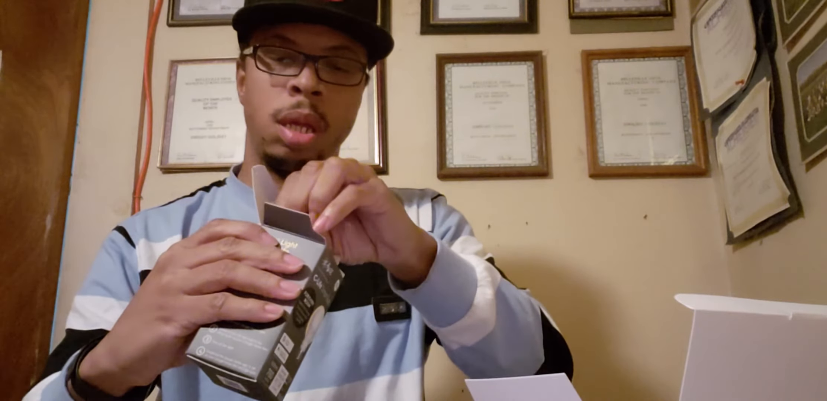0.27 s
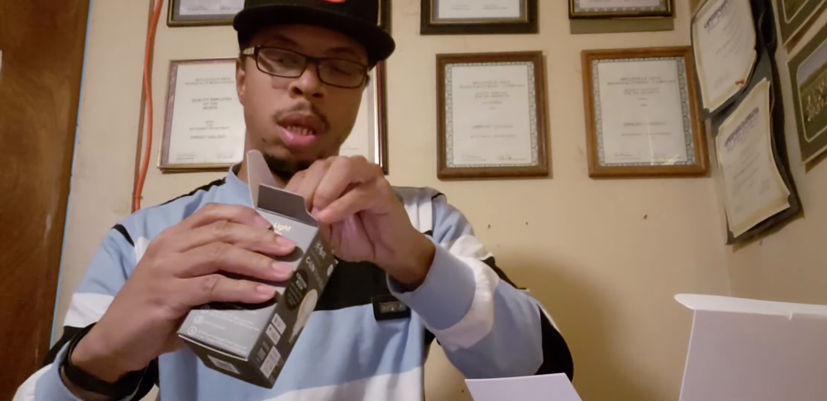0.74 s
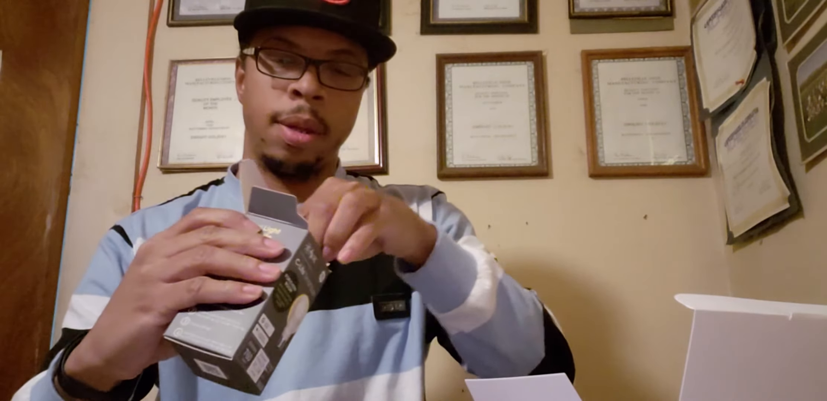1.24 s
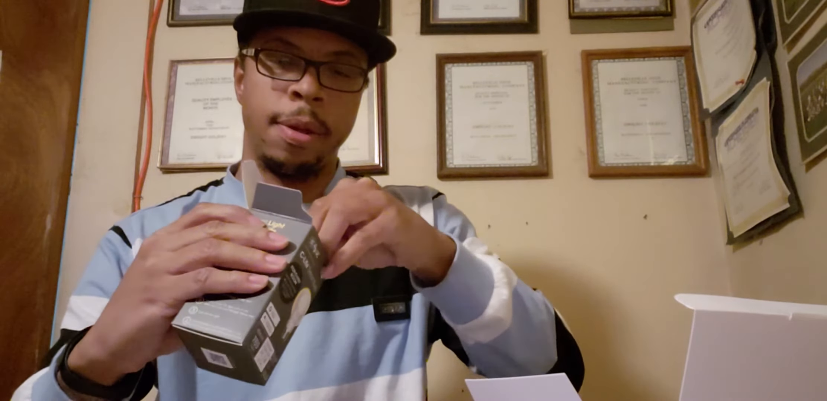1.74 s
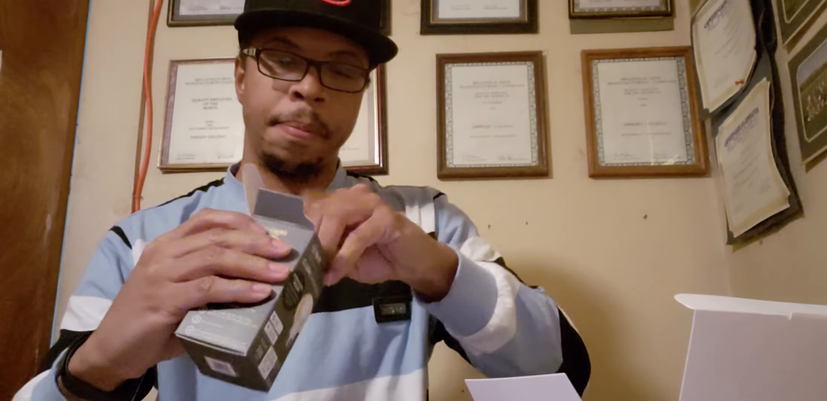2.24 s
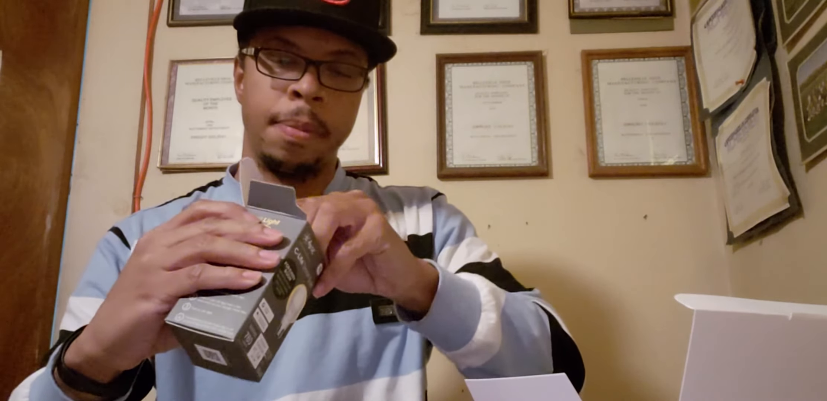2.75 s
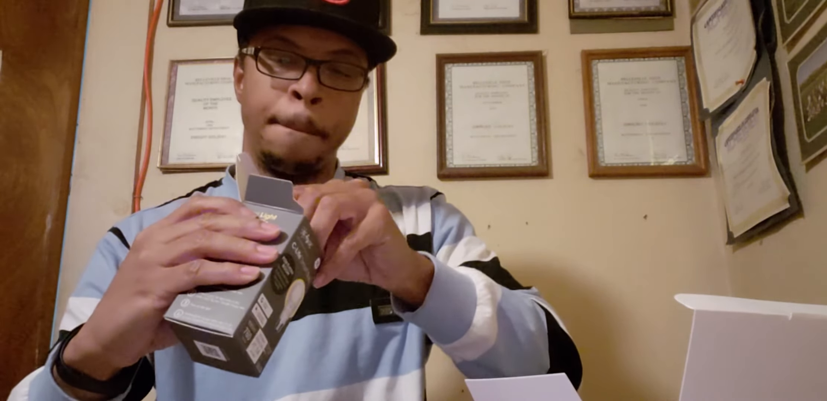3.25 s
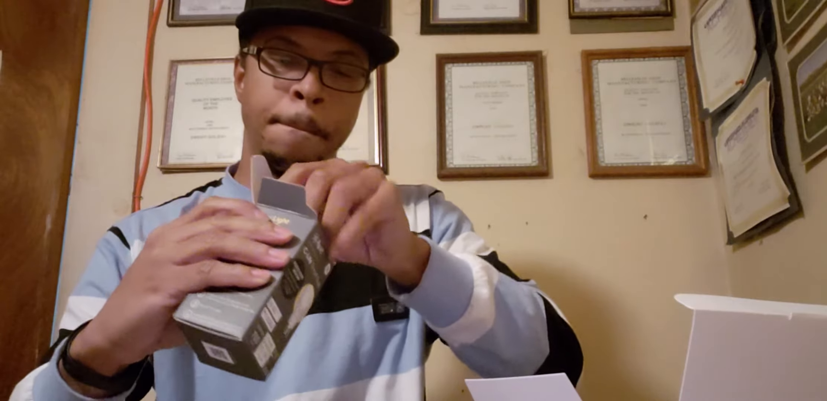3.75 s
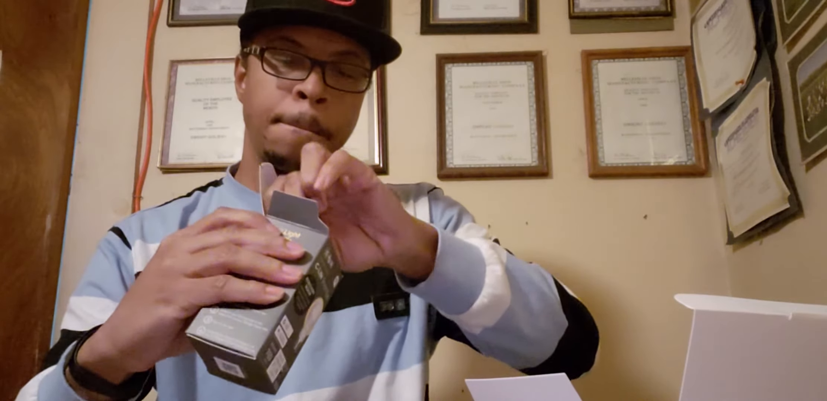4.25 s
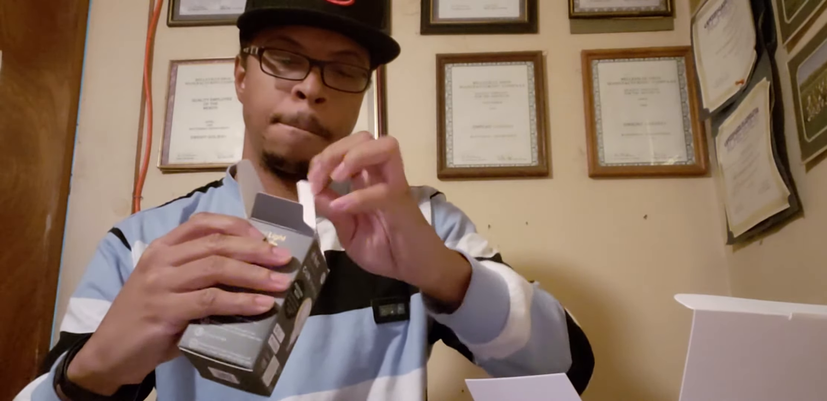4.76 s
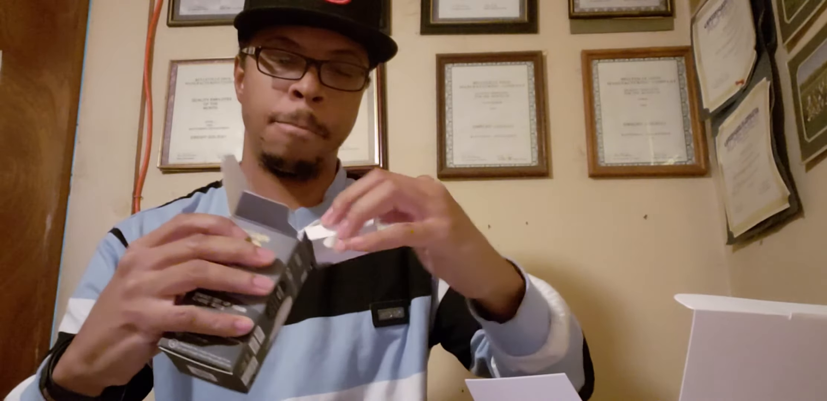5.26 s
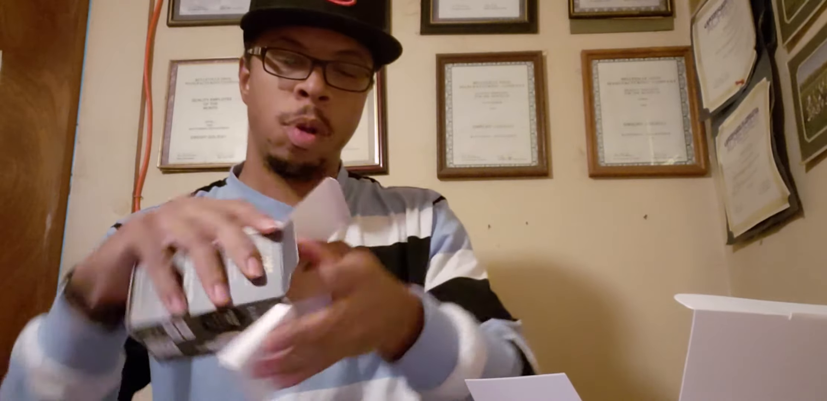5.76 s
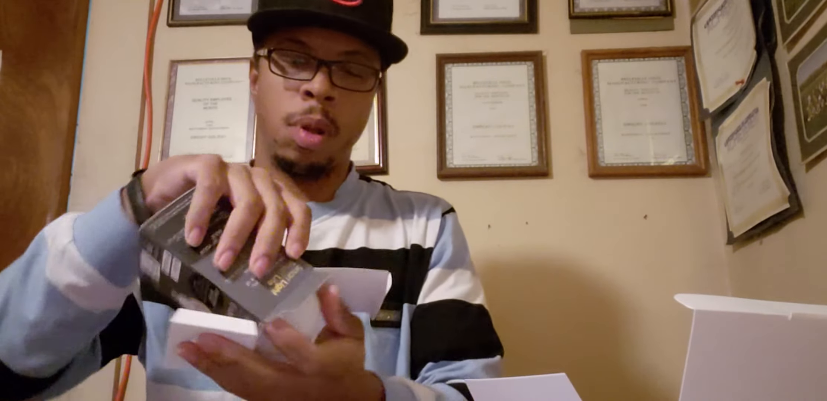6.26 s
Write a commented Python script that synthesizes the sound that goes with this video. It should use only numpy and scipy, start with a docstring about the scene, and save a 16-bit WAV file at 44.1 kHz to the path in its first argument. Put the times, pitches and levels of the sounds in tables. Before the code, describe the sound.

Close dry cardboard fumbling in a quiet small room: scratchy rubbing, faint squeaks, a hard snap midway, later shuffling and a knock into the palm.

```python
"""Fingers pry at the flap and insert of a small cardboard box, close to a two-port microphone in a small quiet room.
Skin and card rub in short strokes of stick-slip grains, with squeaks and narrow papery scrapes in fuzzy lines.
Edges catch and snap free, one loudly; the contents slide out and knock the palm: bursts of slip noise.
These grains and bursts shake the hollow box (low), the card faces (middle) and the paper fibres (treble hiss).
Soft pushes of the box ring low; the room answers the contacts over a faint rumble and hiss."""
import sys
import numpy as np
from scipy import signal
from scipy.fft import rfft, irfft, next_fast_len
from scipy.io import wavfile
from scipy.ndimage import uniform_filter1d

SR = 44100
rng = np.random.default_rng(int(sys.argv[2]) if len(sys.argv) > 2 else 0)


def generate_wav(signal):
    """Clip the signal to [-1, 1] and save it as 16-bit WAV at the path in sys.argv[1]."""
    frames = np.transpose(np.atleast_2d(signal))
    scaled = np.clip(frames, -1, 1) * 32767
    pcm = np.round(scaled).astype(np.int16)
    wavfile.write(sys.argv[1], SR, pcm)


N = 287091  # samples


def gain_of(db):
    """dB to gain."""
    return 10 ** (np.asarray(db) / 20)


def evened(x):
    """Scales to rms 1."""
    return x / np.sqrt(np.mean(x ** 2) + 1e-20)


def read(points, hz):
    """Reads a curve of (f/Hz, value) on a log-frequency axis."""
    f, value = np.transpose(points)
    return np.interp(np.log(hz + 1), np.log(f + 1), value)


def add(mix, s, sound):
    """Adds a sound at time s, cut off where the mix ends."""
    part = mix[..., round(s * SR):][..., :sound.shape[-1]]
    part += sound[..., :part.shape[-1]]


def ring(hz, width, db, rise_s=.0001):
    """A damped mode: a sine that dies faster the wider its resonance (Hz)."""
    t = np.arange(SR // 5) / SR
    envelope = np.exp(-np.pi * width * t) * (1 - np.exp(-t / rise_s))
    return gain_of(db) * np.sqrt(width) * np.sin(2 * np.pi * hz * t) * envelope


def resonate(x, hz, width):
    """A moving resonance: shifts the curve hz down to zero, smooths twice, and shifts back."""
    turn = np.exp(2j * np.pi * np.cumsum(hz) / SR)
    r = np.exp(-np.pi * width / SR)
    smooth = signal.lfilter([1], np.convolve([1, -r], [1, -r]), x / turn)
    return evened((turn * smooth).real)


def tilted(hiss, tilt_db):
    """Trades the upper treble against the lower."""
    low = signal.sosfiltfilt(signal.butter(1, 9500, fs=SR, output="sos"), hiss)
    return gain_of(-tilt_db / 2) * low + gain_of(tilt_db / 2) * (hiss - low)


def bodies():
    """Unit-energy responses of card faces, hollow box and fibres; the small faces radiate little below their modes."""
    # card face modes: f/Hz, width/Hz, relative level/dB
    card_modes = [(1776, 420, 4), (2046, 150, 4), (2740, 450, 5), (3833, 210, 7), (4210, 980, 9),
                  (6340, 7300, -9)]
    # hollow box modes: f/Hz, width/Hz, relative level/dB
    box_modes = [(250, 83, -9.5), (327, 160, -2), (493, 297, 1.5), (762, 89, -0.5), (884, 40, -1),
                 (1050, 370, -5.5), (1269, 84, -2.5)]
    # hiss spectrum of the paper fibres: f/Hz, relative level/dB per Hz
    fibre_curve = [(4000, -24.5), (5800, -4), (7600, 2), (9500, -5), (12000, -0.5), (16000, -6)]
    # neighbouring modes start with opposite sign
    card = sum((-1) ** k * ring(*mode) for k, mode in enumerate(card_modes))
    box = sum((-1) ** k * ring(*mode) for k, mode in enumerate(box_modes))
    card = signal.sosfilt(signal.butter(2, 1500, "high", fs=SR, output="sos"), card)
    fibres = np.zeros(len(card))
    click = irfft(gain_of(read(fibre_curve, np.fft.rfftfreq(128, 1 / SR))))
    fibres[:128] = np.roll(click, 12)
    return [h / np.linalg.norm(h) for h in (card, box, fibres)]


def strokes():
    """Levels of card, box and fibres are the summed power of all strokes; the colour is their power-weighted average."""
    # rubbing strokes: hardest moment/s, swell/s, fade/s, card drive/dB, box drive re card/dB,
    # fibre drive re card/dB, scrape colour/Hz, box tone/Hz, upper re lower treble/dB
    stroke_table = [(0.0, .01, 0.082, -53.5, -2, -2, 4025, 775, -6),
                    (0.236, .05, 0.0415, -55.5, 0.5, -2.5, 2244, 800, 0),
                    (0.383, 0.17, 0.11, -64, -17, -13.5, 2042, 970, -20),
                    (0.518, .08, 0.056, -65.5, -19, -12, 2836, 847, -21),
                    (0.626, 0.073, .1, -65, -23, -10.5, 3230, 1224, -14),
                    (0.684, 0.091, 0.049, -59.5, -8.5, -10, 2936, 1100, -14),
                    (0.869, 0.099, 0.087, -54, -9.5, -5.5, 2760, 942, -13.5),
                    (1.028, .04, 0.21, -56.5, -15.5, -4.5, 2700, 859, 8),
                    (1.21, .08, 0.16, -50.5, -49, -4.5, 3097, 1117, 3),
                    (1.228, .012, 0.12, -63, 3, -10, 2600, 1200, 3),
                    (1.278, .05, 0.034, -60, 1, -19, 2480, 950, -6),
                    (1.371, 0.1, 0.083, -63, -1.5, -3, 2466, 1023, 5),
                    (1.5, 0.033, 0.083, -66, -6, -3, 2427, 814, -12),
                    (1.62, 0.054, 0.12, -60.5, -2, -2, 2544, 834, -1),
                    (1.854, 0.046, 0.041, -55, -45, 1, 3097, 1124, 1),
                    (1.931, 0.013, .04, -68, 0, -7, 2865, 1295, 2),
                    (2.159, 0.066, 0.11, -60.5, -7.5, -8, 3000, 572, -5),
                    (2.292, 0.084, 0.072, -55.5, -19, -3.5, 2920, 897, 4),
                    (2.41, 0.071, 0.14, -58.5, -10, 0.5, 2680, 903, 5),
                    (2.66, 0.008, 0.071, -67.5, -2.5, -8, 2320, 830, -14),
                    (2.72, .03, 0.058, -64, 11.5, -8, 2330, 763, -20),
                    (2.808, .02, .04, -62, 14.5, -9, 2413, 826, -23),
                    (2.865, 0.12, 0.044, -62.5, -22, -5, 3064, 881, -3),
                    (3.018, 0.066, .08, -59, 0, -7, 2093, 688, -12),
                    (3.08, 0.042, 0.046, -73.5, 7.5, -9, 2363, 480, 1.5),
                    (3.186, 0.11, 0.054, -65.5, -36.5, -6, 3730, 856, -15),
                    (3.211, 0.014, .11, -55.5, -4.5, -8.5, 3560, 802, 0),
                    (3.4, 0.36, 0.091, -67, -24, -10, 2943, 776, -1),
                    (3.449, 0.054, 0.17, -61.5, -6, -14, 2840, 726, -20),
                    (3.523, .1, 0.023, -66, -6, -5, 2905, 1012, -3.5),
                    (3.799, 0.14, 0.027, -66, -24, 7, 3640, 823, -0.5),
                    (3.958, 0.19, 0.067, -63.5, -10, -3.5, 2910, 869, -10),
                    (4.03, 0.16, .03, -63.5, -31.5, -11, 2960, 870, -19),
                    (4.095, .02, 0.098, -58, -44, -4.5, 3170, 584, -14),
                    (4.14, 0.12, 0.066, -61.5, -40, -4, 2900, 567, -3),
                    (4.221, 0.12, .1, -74, 0.5, 2.5, 2750, 687, -13),
                    (4.425, 0.02, .05, -66.5, -24.5, -18, 2200, 498, 0),
                    (4.513, 0.022, 0.12, -55, -12.5, -3, 3916, 535, 7),
                    (4.576, .02, .1, -51, -1, -12, 3580, 460, 5),
                    (4.6, .02, .06, -54, -13, -13, 2200, 889, 6),
                    (4.68, 0.15, 0.044, -59, 3, -5, 2590, 623, 18),
                    (4.8, 0.087, 0.156, -71, 7.5, -3, 2028, 875, -1),
                    (4.978, 0.22, 0.14, -68, 0, 0.5, 1840, 790, -0.5),
                    (5.11, .06, 0.2, -57, -9, 4, 2860, 857, -4),
                    (5.2, .015, 0.051, -49.5, -16, 3, 2000, 780, -4),
                    (5.26, 0.12, .035, -59.5, 2, -2, 3450, 772, 7.5),
                    (5.338, 0.036, 0.023, -63.5, -18, -7, 3500, 835, -2.5),
                    (5.394, .015, 0.23, -65.5, -1, -3, 2255, 777, -12),
                    (5.57, .08, 0.044, -47.5, -7.5, -1.5, 3023, 683, 7),
                    (5.652, .05, 0.17, -62, -2, 4.5, 2890, 454, 6),
                    (5.77, 0.04, 0.12, -61.5, 1, 3.5, 2770, 528, 9),
                    (5.832, .1, 0.11, -62, 5, 6.5, 2630, 714, 2),
                    (5.931, .1, 0.043, -58.5, -15, -2, 2686, 471, -1),
                    (6.02, 0.099, .1, -70.5, 11.5, 6, 2367, 644, -8),
                    (6.1, 0.054, 0.12, -49.5, 0, -3, 2300, 747, 5),
                    (6.236, .015, .03, -44.5, -15, -7, 1700, 1094, -4),
                    (6.28, .05, 0.16, -67.5, 11, -3, 1806, 930, -11),
                    (6.33, 0.13, .05, -55, -11, -5, 2016, 926, 6),
                    (6.431, 0.067, 0.035, -48, 0.5, -5, 2600, 392, -8),
                    (6.51, 0.052, .05, -59, 4, -1, 2953, 428, -12)]
    span_db = 20  # level change over one swell or one fade
    s, swell_s, fade_s, card_db, box_db, hiss_db, *colour = np.array(stroke_table).T[:, :, None]
    t = np.arange(N // 32 + 2) * 32 / SR
    drop_db = span_db * np.maximum((s - t) / swell_s, (t - s) / fade_s)
    power = gain_of(2 * (card_db - drop_db)) + 1e-30
    levels = [np.sqrt((power * gain_of(2 * db)).sum(0)) for db in (0, box_db, hiss_db)]
    colour = [(power * c).sum(0) / power.sum(0) for c in colour]
    return [np.interp(np.arange(N) / SR, t, c) for c in levels + colour]


def rubbing():
    """Dense uneven stick-slip grains under a trembling finger; the colour shifts with the grip, also in random patches."""
    # side of the rubbing hand: t/s, left re right level/dB
    hand_side = [(0.0, 2), (3.53, 2), (3.71, 5), (3.95, 1), (4.96, 8), (6.41, 1.5), (6.5, 6)]
    grains_per_s, scrape_width = 6100, 1100  # mean rate, Hz
    scrape_db = -4  # scrape colour re card faces
    card_level, box_level, hiss_level, scrape_hz, box_hz, tilt_db = strokes()
    strength_db = 1.0 * np.minimum(rng.exponential(1, N), 6)
    grains = rng.standard_normal(N) * gain_of(strength_db) * (rng.random(N) < grains_per_s / SR)
    tremble = evened(uniform_filter1d(rng.standard_normal(N), 600))
    drive = evened(grains * gain_of(3.5 * tremble))
    card, box, hiss = (signal.oaconvolve(drive, h)[:N] for h in bodies())
    card = 0.59 * (card + gain_of(scrape_db) * resonate(drive, scrape_hz, scrape_width))
    box = .5 * box + 0.47 * resonate(drive, box_hz, 180)
    sound = card_level * card + box_level * box + hiss_level * tilted(hiss, tilt_db)
    # random patches in time and frequency, 2.2 dB rms
    z = signal.stft(sound, nperseg=256, noverlap=192)[2]
    patches = uniform_filter1d(rng.standard_normal(z.T.shape).T, 6, 0)
    patches = evened(uniform_filter1d(patches, 24, 1))
    sound = signal.istft(z * gain_of(2.2 * patches), nperseg=256, noverlap=192)[1][:N]
    pan_db = np.interp(np.arange(N) / SR, *np.transpose(hand_side))
    return sound * gain_of([pan_db / 2, -pan_db / 2])


def squeaks_and_scrapes():
    """Squeaks and narrow papery scrapes: fuzzy lines on three multiples of one pitch."""
    # squeaks and scrapes: start t/s, length/s, level of the first line/dB, f/Hz,
    # second multiple re first/dB, third multiple re first/dB
    line_table = [(0, 0.033, -62.5, 2060, 2, -2), (0.076, 0.073, -66, 2060, -7, -6.5),
                  (2.644, 0.05, -63, 2170, -25, -29), (0.497, 0.042, -72.5, 2630, -26, -26),
                  (0.65, 0.042, -70.5, 1260, -8, -28), (0.841, 0.034, -64, 2600, -20, -29),
                  (3.977, 0.06, -64, 2990, -26, -24), (4.082, 0.075, -65, 3380, -27.5, -24),
                  (4.41, 0.03, -63.5, 2196, -24.5, -12), (4.824, .21, -72, 2080, -24, -13),
                  (5.05, 0.11, -66.5, 2050, -24, -7)]
    line_width = 150  # Hz for the first line, in proportion for the others
    out = np.zeros(N)
    for (s, length, db, hz, *over_db), chance in zip(line_table, rng.standard_normal((len(line_table), SR // 2))):
        x = chance[:round(length * SR)]
        lines = np.zeros(len(x))
        for k, line_db in enumerate((0, *over_db), start=1):
            lines += gain_of(line_db) * resonate(x, np.full(len(x), k * hz), k * line_width)
        add(out, s, gain_of(db) * lines * signal.windows.tukey(len(x), .4))
    return out


def room(x):
    """A few near echoes, then sparse reflections of random sign, each band dying at its own speed.
    The hands move, so the sound passes slowly from one set of reflections to another."""
    # decay of the room: f/Hz, time to fall 60 dB/s
    decay = [(150, 0.28), (500, 0.13), (1000, 0.24), (2000, 0.18), (5000, 0.19), (12000, 0.15)]
    # share of the reflections common to both ports: f/Hz, share of power
    common = [(300, 0.79), (600, 0.56), (1000, 0.24), (3000, 0.21), (12000, 0.057)]
    # desk and near wall: delay/s, left level/dB, right level/dB
    near_echoes = [(.0022, -19.5, -7.5), (.0065, -10.5, -30), (.011, -9, -18)]
    first_wall, tail_db = 260, -0.5  # samples before the reflections start, tail energy re direct sound
    out, turn = np.zeros((2, N)), np.pi * 1.3 * np.arange(N) / SR
    for shift in range(3):
        # one reflection at a random place in every 20 samples
        taps, places = np.zeros((3, SR // 2)), np.arange(first_wall, SR // 2 - 20, 20)
        places = places + rng.integers(0, 20, (3, len(places)))
        np.put_along_axis(taps, places, rng.choice([-1., 1.], places.shape), 1)
        hz, t, z = signal.stft(taps, SR, nperseg=256)
        same = read(common, hz)[:, None]
        z = np.sqrt(same) * z[0] + np.sqrt(1 - same) * z[1:]
        z = z * gain_of(-60 * t / read(decay, hz)[:, None])
        tail = signal.istft(z, SR, nperseg=256)[1]
        tail = gain_of(tail_db) * tail / np.linalg.norm(tail[0])
        share = np.sqrt(2 / 3) * np.cos(turn + shift * np.pi / 3)
        out += signal.fftconvolve((x * share)[None], tail, axes=1)[:, :N]
    for s, *db in near_echoes:
        add(out, s, gain_of(db)[:, None] * x)
    return out


def air():
    """Room and microphone noise: steady low rumble and faint hiss, slightly patchy."""
    # noise spectrum: f/Hz, relative level/dB per Hz
    noise_curve = [(12, -34.5), (20, -5.5), (86, -1.5), (146, -7), (187, -22.5), (262, -17.5), (542, -23),
                   (1120, -19.5), (1710, -27.5), (1860, -17.5), (3070, -26.5), (12400, -28.5),
                   (16000, -29.5)]
    # likeness of the two ports: f/Hz, correlation
    likeness = [(30, 1), (300, 0.38), (1000, 0.44), (4000, .4), (12000, 0.33)]
    level_db = -70.5  # rms over both ports
    frames, hz = N // 512 + 5, np.fft.rfftfreq(2048, 1 / SR)
    a, b, c, d, patches = rng.standard_normal((frames, 1025, 5)).T
    patches = evened(uniform_filter1d(uniform_filter1d(patches, 12, 0), 8, 1))
    same = read(likeness, hz)[:, None]
    left = a + 1j * b
    right = same * left + np.sqrt(1 - same ** 2) * (c + 1j * d)
    z = np.array([left, right]) * gain_of(read(noise_curve, hz)[:, None] + 1.5 * patches)
    return gain_of(level_db) * evened(signal.istft(z, nperseg=2048, noverlap=1536)[1][:, :N])


def snaps():
    """An edge lets go: a crack and a short slip of noise shake the box; the freed edge and panel ring at their own pitch."""
    # snaps and knocks: t/s, card level/dB, box re card/dB, hiss re card/dB, edge f/Hz, box panel f/Hz,
    # slip decay/s, upper re lower treble/dB, left re right/dB
    snap_table = [(0.087, -48, -4.5, -1, 2010, 776, 0.0045, 4, 1.0),
                  (0.203, -53.5, 1.5, 5.5, 1950, 690, 0.0071, 4, 4),
                  (0.865, -42.5, -38, -4.5, 2500, 1300, 0.0032, -18, 5),
                  (0.9706, -33, -8.5, -8, 2700, 673, 0.0049, -3, 1.5),
                  (1.478, -57, -9, -18, 2400, 950, 0.0051, 3, 2),
                  (1.515, -31, -11.5, -11, 1700, 380, 0.0017, 13, 0),
                  (1.5465, -25, -3.5, 0, 1830, 654, 0.0032, 30, 1),
                  (2.1295, -44, -9, -2, 1810, 323, 0.0013, -22, 2),
                  (2.6458, -55, -4.5, -3, 2370, 880, 0.013, -8, 2),
                  (2.879, -17.5, -14, -1.5, 1890, 1320, 0.0046, 3, 1),
                  (2.8915, -9, -20, -3.5, 2160, 420, 0.0023, -23, 1),
                  (2.897, -25.5, -7.5, -19, 2180, 880, 0.003, -5, -6),
                  (3.2095, -49.5, 1, -2.5, 4000, 910, 0.0022, -12, -4),
                  (3.9108, -37, -17, -7.5, 3570, 710, 0.0042, -26, 2.5),
                  (4.41, -57, -20, -29, 2060, 435, 0.0035, 13, -3),
                  (4.5875, -37, -6, 5, 4040, 840, 0.0056, 11, 2),
                  (4.6183, -33.5, 4.5, 2, 3330, 371, 0.005, 28, 1.5),
                  (4.7505, -44.5, -0.5, 5.5, 2310, 985, 0.0069, 1, 7),
                  (4.76, -47.5, -21, 7.5, 1750, 1000, 0.0064, -7, 10.5),
                  (5.198, -32, -1, -0.5, 1780, 747, 0.0034, 3, 4.5),
                  (5.392, -54, -4, -9, 1670, 747, 0.0042, -6, 2),
                  (5.509, -46, -8, 1.5, 3800, 760, 0.0037, -17, 5),
                  (5.574, -53.5, 4, -8, 2500, 486, 0.0016, -3, 2),
                  (5.642, -59.5, 5.5, -8, 2800, 515, 0.0032, -2, 6),
                  (5.6938, -37.5, -7, -6, 5300, 820, 0.00067, -10, 2),
                  (5.7382, -30, -13, -4.5, 1720, 950, 0.0015, 19, 0),
                  (5.788, -53.5, 11, -4, 2600, 506, 0.0025, 0, 4),
                  (5.8062, -45.5, 3.5, 4.5, 3340, 810, 0.0082, 14, 1),
                  (5.915, -51, 1, -6, 2170, 500, 0.0041, 5, 5),
                  (6.037, -47.5, 1, -18, 1600, 835, 0.0012, -8, 6),
                  (6.086, -35.5, -6, -15, 1970, 516, 0.0025, -6, 4),
                  (6.094, -47.5, 5.5, -16, 2330, 840, 0.0041, 0, 10),
                  (6.2382, -34.5, -2.5, -23, 1630, 1220, 0.0035, 7, 6.5),
                  (6.3442, -22.5, -2, -8.5, 2014, 300, 0.005, -5, 1.5),
                  (6.4282, -41.5, -1.5, -12, 2830, 258, 0.0043, -11, 6)]
    crack, crack_s = 3.5, .0007  # height over the slip noise, decay in s
    rise_share, edge_width = 0.25, 700  # rise time re slip decay, Hz
    out, t = np.zeros((2, N)), np.arange(SR // 10) / SR
    card, box, fibres = bodies()
    noise = rng.standard_normal((len(snap_table), len(t)))
    for (s, db, box_db, hiss_db, edge_hz, box_hz, slip_s, tilt_db, pan_db), chance in zip(snap_table, noise):
        slip = chance * np.exp(-t / slip_s) * (1 - np.exp(-t / (rise_share * slip_s)))
        slip = slip * (1 + crack * np.exp(-t / crack_s))  # the release itself is the hardest moment
        edge, panel = ring(edge_hz, edge_width, 0), ring(box_hz, 62, 0)
        edge = np.diff(edge, prepend=0)  # a small edge radiates little bass
        faces = 0.47 * card + 0.83 * edge / np.linalg.norm(edge)
        hollow = 0.54 * box + 0.89 * panel / np.linalg.norm(panel)
        parts = [signal.fftconvolve(slip, h) for h in (faces, hollow, tilted(fibres, tilt_db))]
        sound = 0
        for part_db, part in zip((db, db + box_db, db + hiss_db), parts):
            near_peak = np.sort(abs(part))[-6]  # sixth largest sample, steadier than the very peak
            sound = sound + gain_of(part_db) * part / near_peak
        add(out, s, sound * gain_of([[pan_db / 2], [-pan_db / 2]]))
    return out


def thumps():
    """Soft pushes of the whole box against the hand: low single rings that swell softly."""
    # pushes: t/s, peak level/dB, f/Hz, time to fall about 35 dB/s
    thump_table = [(0.875, -58.5, 136, 0.16), (2.896, -55.5, 204.7, 0.12), (4.615, -54.5, 230, 0.17),
                   (5.641, -59, 69.5, 0.043), (6.09, -61.5, 86.5, 0.057), (6.231, -57.5, 116, 0.065),
                   (6.346, -39, 141, 0.13)]
    out = np.zeros(N)
    for s, db, hz, decay_s in thump_table:
        swell = 1 - np.exp(-np.arange(SR // 5) / SR / 0.0035)
        sound = ring(hz, 1.3 / decay_s, 0, rise_s=0.0034) * swell
        add(out, s, gain_of(db) * sound / abs(sound).max())
    return out


def scene():
    """Direct sound reaches the right port slightly earlier, and is mostly a little louder on the left.
    The box is too small to radiate deep bass; the room answers every contact."""
    left_lag_s = 3e-5
    contacts = rubbing() + squeaks_and_scrapes() + snaps()
    near = signal.sosfilt(signal.butter(2, 170, "high", fs=SR, output="sos"), contacts)
    size = next_fast_len(N)
    lag = np.exp(-2j * np.pi * np.fft.rfftfreq(size, 1 / SR) * [[left_lag_s], [0]])
    direct = irfft(rfft(near, size) * lag, size)[:, :N]
    return direct + room(near.mean(0)) + thumps() + air()


def record(dry):
    """A steep low-pass at 16200 Hz: nothing sounds above it."""
    low_pass = signal.firwin(511, 16200, window=("kaiser", 9), fs=SR)
    return signal.oaconvolve(dry, low_pass[None], "same")


dry = scene()
out = record(dry)
generate_wav(out)
```